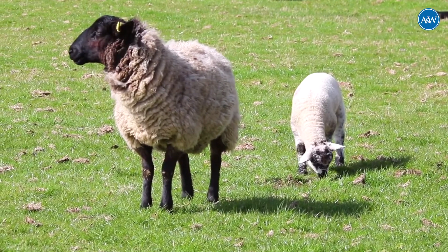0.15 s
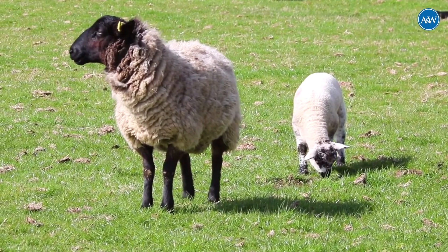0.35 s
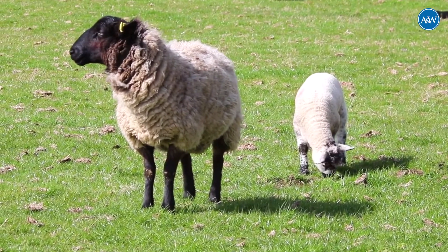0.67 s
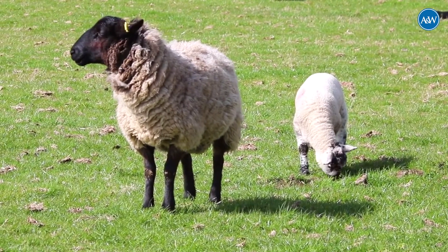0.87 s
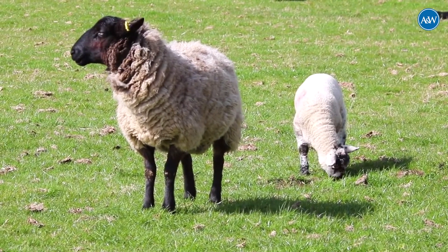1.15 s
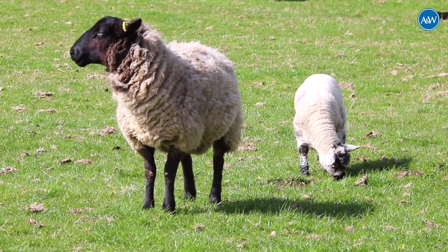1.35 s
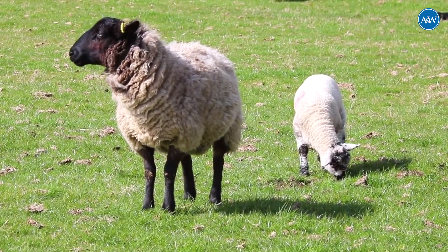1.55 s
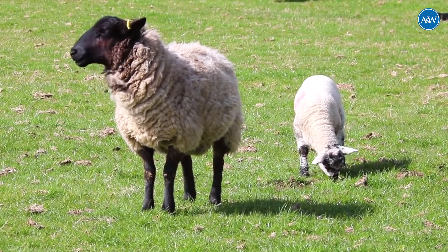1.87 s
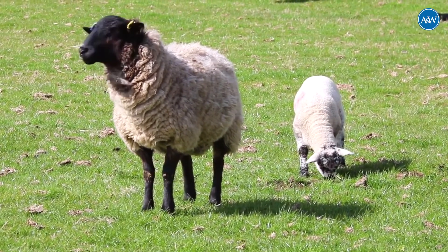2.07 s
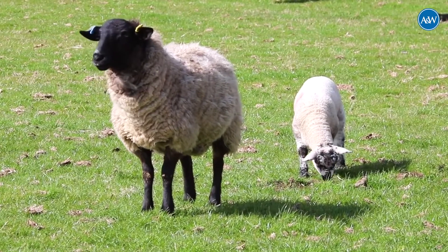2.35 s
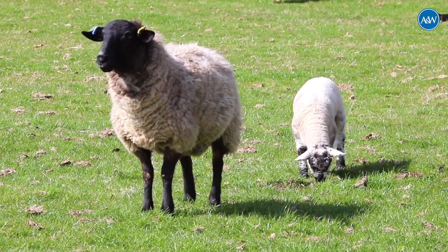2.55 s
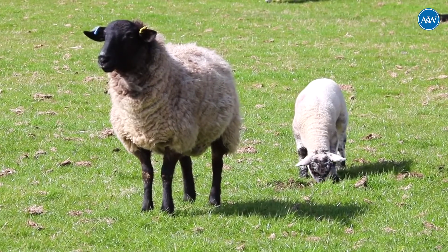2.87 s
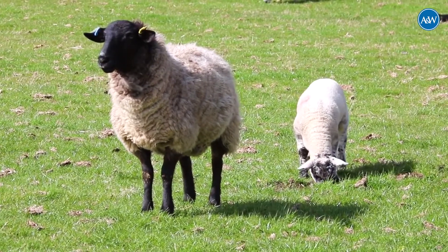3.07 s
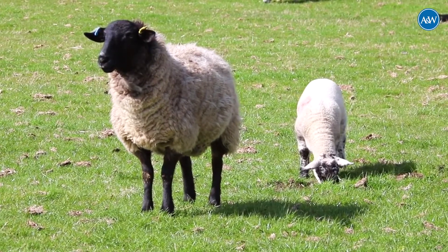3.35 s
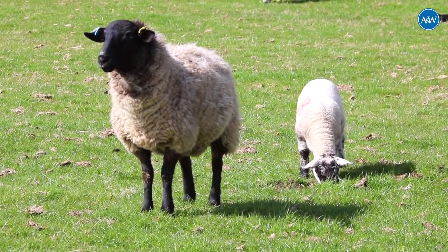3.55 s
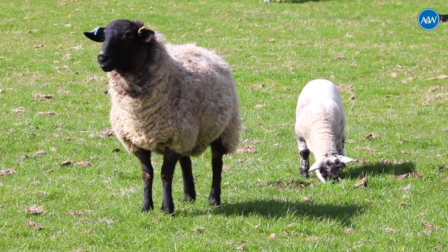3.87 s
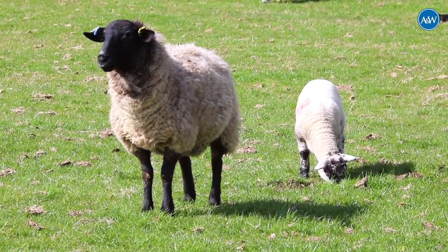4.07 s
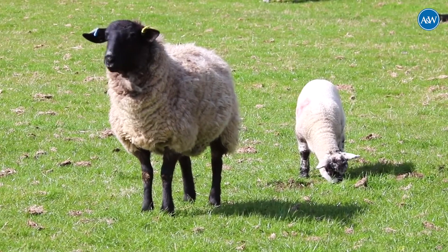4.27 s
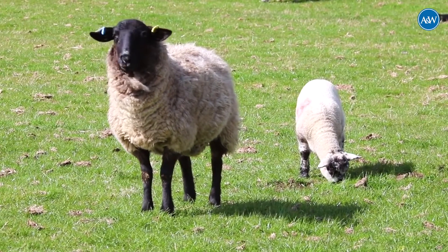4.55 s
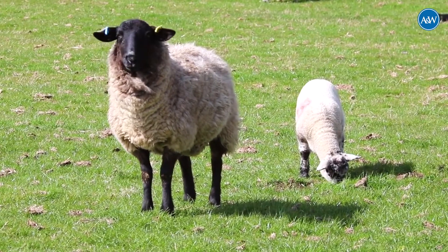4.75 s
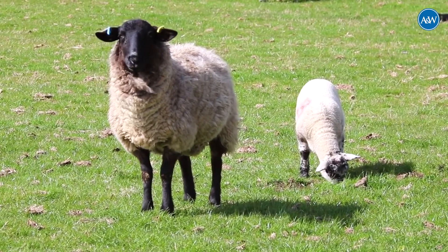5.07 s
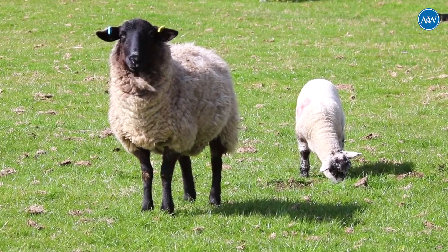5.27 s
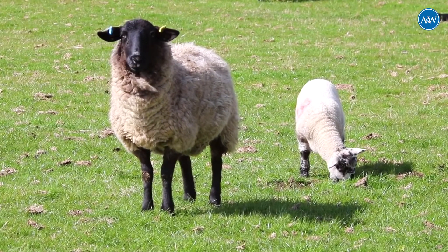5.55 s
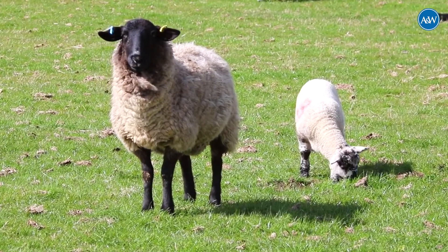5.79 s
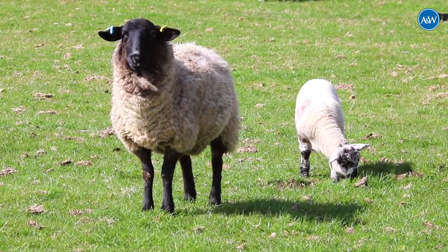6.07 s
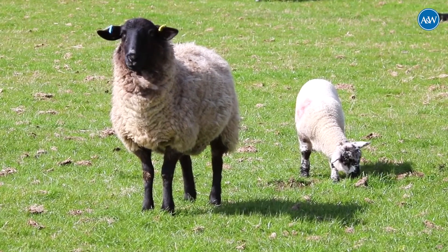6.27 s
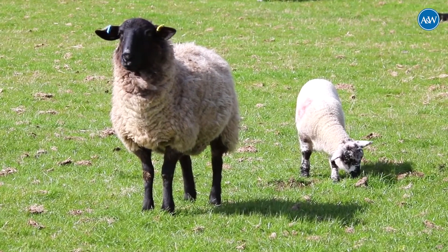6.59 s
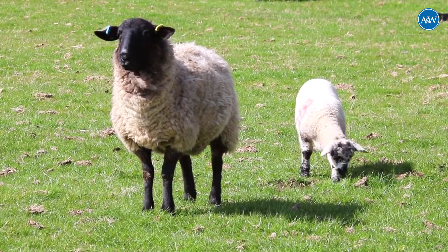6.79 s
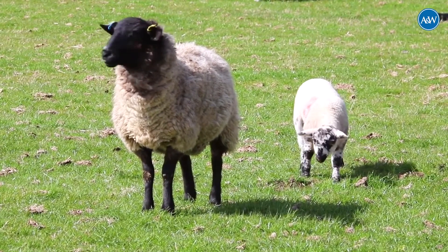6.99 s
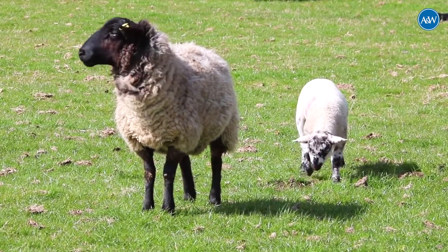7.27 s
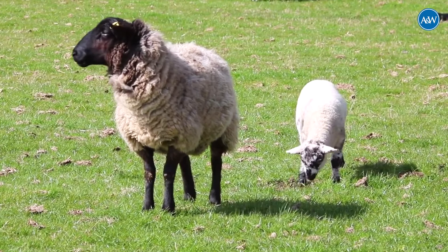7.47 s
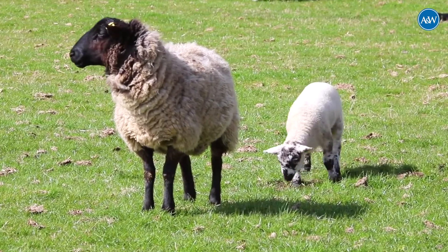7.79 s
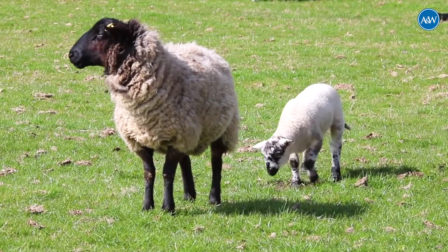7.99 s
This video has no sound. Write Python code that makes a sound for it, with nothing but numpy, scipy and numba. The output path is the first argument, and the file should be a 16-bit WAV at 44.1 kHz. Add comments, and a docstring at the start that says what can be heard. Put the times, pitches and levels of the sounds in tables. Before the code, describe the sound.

Gusty wind rumbles on the microphone and little birds twitter, with a single sheep bleat midway and faint hollow knocks later.

```python
"""Gusts buffet the microphone, each port on its own, and small birds whistle in trees to the right.
Midway a sheep gives one long bleat: pulses from its vocal folds excite the moving resonances of its
throat. A faint cooing and then dull, hollow knocks come from the left.
A far rumble and a faint hiss lie under it all."""
import sys
import numpy as np
from scipy import signal
from scipy.io import wavfile
from scipy.ndimage import uniform_filter1d
from numba import njit

SR = 44100
rng = np.random.default_rng(int(sys.argv[2]) if len(sys.argv) > 2 else 0)


def to_wav(s):
    """Save 16-bit WAV."""
    ch = np.atleast_2d(s).T  # columns
    pcm = np.round(np.clip(ch, -1, 1) * 32767)  # PCM
    wavfile.write(sys.argv[1], SR, pcm.astype(np.int16))


N = 358533

# the sheep's mouth: t/s, shape (0 outbreak, 0.5 half open, 1 held, 2 and above closing)
MOUTH = [(3.51, 0.02), (3.55, 0.54), (3.61, 0.79), (3.7, 0.91), (4.05, 1.18), (4.43, 1.56), (4.46, 1.32),
         (4.6, 1.92), (4.63, 3.9)]


def sheep(jitter=.0012, rasp_jitter=.002, shimmer_db=1.0, breath_db=-40):
    """Source-filter voice: one pulse per closure of the vocal folds, with breath, drives the throat."""
    # course of the bleat: t/s, f/Hz, level/dB
    bleat = [(3.516, 167.9, -41), (3.55, 173.6, -40.5), (3.585, 202.5, -44), (3.6, 213.4, -40),
             (3.641, 241.8, -43.5), (3.7, 248.2, -47), (3.901, 252.8, -50), (4.1, 252.2, -47),
             (4.301, 244.3, -50), (4.379, 244.6, -49), (4.43, 238.7, -50), (4.445, 233.4, -51.5),
             (4.499, 233, -51), (4.56, 228.6, -50), (4.611, 221.3, -49.5), (4.633, 208, -53)]
    # sharp high clicks on some pulses of the bleat: t/s, strength/dB
    clicks = [(3.5179, -17.5), (3.5244, -15), (3.5304, -22), (3.5364, -25), (3.5643, -30), (3.5997, -25),
              (3.6054, -28), (3.6177, -27), (3.6391, -33), (4.4069, -38), (4.6274, -43)]
    onset_s, release_s, edge_db = 0.0085, 0.014, -13
    quaver_hz, quaver_depth, quaver_from_s = 16, 0.0063, 4.44   # the voice trembles as it tires
    (first_s, first_hz, first_db), (last_s, last_hz, last_db) = bleat[0], bleat[-1]
    rows = [(first_s - onset_s, first_hz, first_db + edge_db), *bleat,
            (last_s + release_s, last_hz, last_db + edge_db)]
    pitch_hz, level_db = in_time(rows)
    start, end = round(rows[0][0] * SR), round(rows[-1][0] * SR)
    rasp = 1 - np.minimum(in_time(MOUTH)[0], 1)   # the outbreak is hoarser
    tired_s = np.maximum(np.arange(N) / SR - quaver_from_s, 0)
    quaver = -quaver_depth * np.sin(2 * np.pi * quaver_hz * tired_s)
    cycles = np.cumsum(pitch_hz * (1 + quaver + (jitter + rasp_jitter * rasp) * drift(46))) / SR
    cycles -= cycles[round((clicks[0][0] + .001) * SR)]   # a pulse falls on the first click
    pulse_at = np.flatnonzero(np.diff(np.floor(cycles)))
    late = (cycles[pulse_at + 1] % 1) * SR / pitch_hz[pulse_at]   # each falls between two samples
    strength = amp(shimmer_db * rng.standard_normal(N)[pulse_at])
    source = amp(breath_db + 6 * rasp * (1 - cycles % 1)) * rng.standard_normal(N)   # puffs of breath
    source[pulse_at] += strength * late
    source[pulse_at + 1] += strength * (1 - late)
    voice = amp(level_db) * throat(source)
    voice[:start], voice[end:] = 0, 0
    click_train = np.zeros(N)
    for s, db in clicks:
        nearest = np.argmin(abs(pulse_at - (s + .001) * SR))
        click_train[pulse_at[nearest]] = amp(db)
    return voice + band(click_train, 4000, 18000)


def throat(source, wander=.012, wander_db=1.8, wander_hz=5):
    """Parallel formants follow the mouth and wander a little; their sum is evened to a steady level."""
    # formants: f/Hz (outbreak, half open, held), width/Hz, gain/dB (outbreak, held, closing)
    formants = [(900, 930, 976, 90, -15, 5.5, -4), (2150, 1950, 1887, 170, -16, 2, -11),
                (2550, 2550, 2550, 270, -14, -1, -24), (2850, 3080, 3153, 324, 4, 7, -6),
                (3950, 3540, 3720, 200, 8, 7.5, 6), (4400, 4300, 4466, 200, -5, 1, -11),
                (5330, 5300, 5640, 350, 8, -2.5, -50)]
    shape, = in_time(MOUTH)
    out = np.zeros(N)
    for k, (outbreak_hz, half_hz, held_hz, width, *levels_db) in enumerate(formants):
        hz = np.interp(shape, [0, .5, 1], [outbreak_hz, half_hz, held_hz])
        turn = 2 * np.pi * hz * (1 + wander * drift(wander_hz)) / SR
        r = np.exp(-np.pi * width / SR)
        gain = amp(np.interp(shape, [0, 1, 2], levels_db) + wander_db * drift(wander_hz))
        out += (-1) ** k * gain * moving_resonance(moving_resonance(source, turn, r), turn, r * r)
    out -= resonance(out, hz=1330, width=400)   # antiresonance of the nasal cavity
    return out / np.sqrt(uniform_filter1d(out ** 2, 1500) + 1e-12)


def birds(burr_hz=250, octave_db=-18, trees_t60_s=0.42, trees_db=-1.5):
    """Fast random modulation broadens each whistle into a burr; the trees add reverberation."""
    # acoustic shadow: f/Hz, gain on the left/dB
    shadow = [(2000, 4), (3000, -1.5), (4200, -9.5), (6000, -18), (7500, -45), (11000, -32)]
    direct = np.zeros((2, N + SR))
    for s, hz, db, burr, rise in whistles():
        n, mid_hz = len(hz), hz.mean()
        u = np.arange(n) / n
        phase = 2 * np.pi * np.cumsum(hz) / SR
        tremble = drift(burr_hz, size=SR // 2)[:n] + 1j * drift(burr_hz, size=SR // 2)[:n]
        burr_share = np.clip(burr, 0, 1) ** 2
        modulation = np.sqrt(1 - burr_share) + np.sqrt(burr_share / 2) * tremble
        tone = np.real(modulation * np.exp(1j * phase))
        octave = amp(octave_db) * np.sin(2 * phase) * (mid_hz < 3800)   # low notes only
        swell = np.sin(np.pi / 2 * np.minimum(u / rise, (1 - u) / (1 - rise)))
        tone_left, octave_left = amp([at_hz(shadow, mid_hz), at_hz(shadow, 2 * mid_hz)])
        i = round(s * SR)
        direct[0, i:i + n] += amp(db + 3) * swell * (tone_left * tone + octave_left * octave)
        direct[1, i:i + n] += amp(db + 11) * swell * (tone + octave)
    direct = direct[:, :N]
    return direct + amp(trees_db) * np.array([scatter(side, trees_t60_s) for side in direct])


def whistles(glide_power=2.2, glide_rise=.36, arch_rise=.68):
    """Frequency sweeps: yields each note's start, pitch track, level, burr and share spent swelling."""
    # glides that settle on their end pitch: t/s, length/s, start f/Hz, end f/Hz, level/dB, burr (0-1)
    glides = [(0.601, 0.018, 3250, 5600, -66, 0.4), (0.604, 0.019, 3280, 4800, -59, 0),
              (0.607, 0.035, 5520, 5600, -52.5, 0.34), (0.8, 0.038, 3090, 3510, -64, 0.75),
              (0.893, .097, 6070, 7520, -61, 0.9), (0.898, 0.064, 7000, 9170, -64, 0.9),
              (0.891, 0.23, 4640, 6770, -67.5, 0.8), (0.902, 0.091, 3760, 4900, -74, 0),
              (.905, 0.22, 2493, 2638, -69.5, 0.5), (.907, 0.19, 7300, 11100, -77.5, 0),
              (0.945, 0.16, 2740, 3520, -69, 0.4), (0.983, 0.13, 5270, 5460, -67, 0.9),
              (1.034, 0.062, 6970, 7700, -55.5, .17), (1.075, 0.025, 6870, 7220, -57, 1),
              (1.096, 0.077, 4370, 4780, -59.5, 0.8), (1.334, 0.033, 2810, 2085, -69, 0.7),
              (1.347, 0.17, 3380, 4370, -71.5, 0.7), (1.433, 0.11, 3500, 3280, -71, 1),
              (1.526, 0.13, 3100, 4530, -67, 0.6), (1.624, 0.074, 3673, 3526, -61, 0.97),
              (1.727, 0.13, 3430, 3364, -66, 0.56), (1.842, 0.1, 6370, 5800, -57.5, 0.7),
              (1.995, 0.4, 2620, 2273, -79.5, 0.9), (2.252, 0.34, 7500, 7270, -86, 0.1),
              (2.561, 0.099, 2660, 3210, -64.5, 0.9), (2.583, 0.042, 5100, 5530, -65.5, 1),
              (2.59, 0.049, 6850, 7080, -62.5, 0.9), (2.594, 0.11, 4000, 4350, -71, 0.6),
              (2.599, 0.093, 1880, 2220, -75.5, 0.7), (2.626, 0.14, 6100, 6360, -66.5, 1),
              (2.724, 0.11, 6290, 6700, -64.5, 0.87), (2.63, 0.29, 4240, 3940, -70.5, 0.9),
              (2.671, 0.086, 2450, 2630, -69.5, 0.5), (2.727, 0.094, 2600, 3410, -68.5, 0.2),
              (2.813, 0.053, 4160, 4690, -58, 0.35), (3.067, 0.048, 3840, 3800, -69.5, 0.7),
              (3.102, 0.097, 3800, 4460, -62.5, 0.8), (3.163, 0.058, 4000, 5080, -64.5, 1),
              (3.171, 0.11, 3460, 3290, -66, 0.95), (3.12, .19, 6620, 7260, -70.5, 0.8),
              (3.266, 0.025, 2030, 3500, -62, 0.2), (3.273, 0.091, 3470, 4480, -62.5, 0.6),
              (3.27, 0.11, 5160, 5250, -72, 0.8), (3.48, 0.035, 3600, 4400, -68, .3),
              (3.367, 0.062, 3690, 3660, -57.5, 0.8), (3.318, 0.057, 6530, 7170, -69, .5),
              (3.697, 0.047, 7600, 6000, -64, 1), (3.704, 0.22, 7830, 7000, -61.5, 0.4),
              (3.84, 0.059, 6320, 6400, -54.5, 0.14), (3.888, 0.02, 6606, 6600, -50, 0.24),
              (3.9, 0.032, 6050, 5900, -66, .36), (3.904, 0.13, 7600, 7030, -63.5, 0),
              (4.021, 0.14, 7420, 6910, -62, 0.01), (4.17, 0.14, 7100, 6790, -71, 0.5),
              (4.377, 0.029, 7900, 7020, -66, 0.2), (4.385, 0.024, 6160, 5560, -68, 1),
              (4.608, 0.034, 5540, 5550, -63.5, 0.9), (4.609, 0.2, 8300, 7530, -62, 0.4),
              (4.631, 0.054, 7550, 7300, -59.5, 0.8), (4.733, 0.073, 8900, 8400, -72, 0.7),
              (4.75, .03, 7300, 7300, -70, 0.4), (4.795, 0.068, 8550, 8320, -62, 0.4),
              (4.818, 0.036, 8500, 7130, -58, 0.6), (4.819, 0.078, 7420, 7230, -60, 0.96),
              (4.835, 0.02, 3010, 3940, -67.5, 0.9), (4.9, 0.055, 2890, 4150, -69, 0.7),
              (4.901, 0.16, 6290, 6740, -59, 1), (4.924, 0.078, 8320, 8220, -51, 0.47),
              (4.982, 0.034, 5170, 5270, -63, 0.7), (4.983, 0.031, 3550, 2880, -68.5, .2),
              (5.037, 0.12, 2490, 2390, -68, 0.95), (5.011, 0.12, 5480, 4780, -57, 0.6),
              (5.019, 0.27, 7530, 7510, -63.5, 1), (5.121, 0.022, 3300, 3185, -61, 0.6),
              (5.183, 0.045, 4120, 4180, -60.5, 0.23), (5.228, 0.08, 5000, 5300, -65.5, 0.6),
              (5.252, 0.13, 4590, 4450, -64.5, 0.83), (5.314, 0.22, 8200, 7440, -64.5, 0.3),
              (5.331, .11, 5420, 5940, -49.5, 0.25), (5.332, 0.069, 6130, 6760, -51, 0.3),
              (5.335, 0.19, 4110, 4050, -68.5, 0.97), (5.467, 0.045, 5880, 6080, -50.5, 0.93),
              (5.524, 0.046, 6030, 5850, -62, 0.85), (5.619, 0.057, 5530, 6450, -54, 0.5),
              (5.652, 0.14, 5880, 5370, -67, 0.9), (5.704, 0.055, 7350, 7300, -55.5, 0.73),
              (5.709, 0.027, 7170, 6700, -50.5, 0.3), (5.742, 0.08, 4560, 4920, -65, 0.8),
              (5.783, 0.049, 5600, 5600, -58.5, 0.8), (5.794, 0.015, 6500, 6000, -58, .5),
              (5.828, 0.02, 2800, 4240, -62, 0.2), (5.864, 0.037, 6280, 6810, -54, 0.6),
              (5.969, 0.026, 6840, 6810, -53, 0.94), (5.97, 0.055, 5500, 5200, -69, 0.8),
              (6.046, 0.043, 7170, 7230, -50.5, 0.35), (6.063, 0.084, 7350, 7690, -45.5, 0),
              (6.131, 0.046, 2520, 4000, -73, 0.3), (6.134, 0.028, 8440, 8030, -58, 0.9),
              (6.178, 0.021, 7470, 7500, -60, 0.6), (6.204, 0.03, 5930, 5870, -53.5, 0.55),
              (6.226, 0.013, 6640, 4160, -60, 1), (6.227, 0.1, 3930, 4104, -60.5, 1),
              (6.363, 0.048, 3840, 3960, -64.5, 0.5), (6.377, 0.094, 4500, 4900, -62, .5),
              (6.438, 0.1, 4400, 4280, -63, 0.67), (6.554, 0.12, 3490, 2830, -66.5, 0.5),
              (6.64, 0.13, 7380, 7170, -60.5, 0.78), (6.728, 0.038, 3230, 2900, -72, 0.4),
              (7.192, 0.033, 2960, 3800, -65, 0), (7.513, 0.02, 3370, 2570, -73, 0),
              (7.666, 0.077, 3510, 2750, -69.5, 0.66), (7.708, 0.034, 4730, 5430, -61, 0.6),
              (7.748, 0.092, 5520, 5110, -61, 0.94), (7.752, 0.089, 4030, 3840, -74, 0.5),
              (7.755, 0.2, 7950, 6930, -69, 0.5), (7.791, 0.028, 5620, 6280, -58, 0.5),
              (7.818, .17, 3446, 2896, -66.5, 1), (7.944, 0.098, 3340, 3140, -68, 1),
              (8.026, 0.15, 3130, 2830, -65, 1), (8.016, 0.13, 5440, 6050, -60, 0.44)]
    # parabolic sweeps: t/s, length/s, f/Hz (start, middle, end), level/dB, burr (0-1)
    arches = [(1.04, .175, 3500, 4030, 4620, -58.5, .1), (1.385, .085, 2800, 3700, 2750, -63.5, .25),
              (1.585, .075, 2400, 3600, 3000, -61, .25), (1.812, .11, 5700, 6700, 6300, -53, .65),
              (3.112, .08, 2400, 3500, 2850, -60, .25), (3.308, .085, 2800, 3650, 2850, -60, .4)]
    for s, length, start_hz, end_hz, db, burr in glides:
        hz = end_hz + (start_hz - end_hz) * (1 - progress(length)) ** glide_power
        yield s, hz, db, burr, glide_rise
    for s, length, *pitches_hz, db, burr in arches:
        parabola = np.polyfit([0, .5, 1], pitches_hz, 2)
        yield s, np.polyval(parabola, progress(length)), db, burr, arch_rise


def wind(lumps_db=3.0, lumps_hz=14, brightening=0.58):
    """Turbulent pressure, uncorrelated between the ports; stronger gusts reach higher frequencies."""
    out = []
    for level_db in (gust_level(1), gust_level(-1)):
        deep = rms_one(band(band(rng.standard_normal(N), 27.0, 68.9, order=1), 10.3, 114.0, order=3))
        upper = rms_one(band(band(rng.standard_normal(N), 88, 155, order=1), 64, 193, order=3))
        gain = amp(level_db + lumps_db * drift(lumps_hz))
        out.append(gain * (deep + amp(8.5) * gain ** brightening * upper))
    return np.array(out)


def gust_level(side, calm_db=-52, fall_db=11.5):
    """Incoherent powers add: the level in dB at one port, from gusts over a calm breeze."""
    # gusts that rise and fall exponentially: peak t/s, half-length/s, level/dB, port (1 left, -1 right)
    gusts = [(0.01, 0.063, -27.5, 1), (.5, 0.32, -55, 1), (0.854, 0.29, -49, 1), (1.464, 0.071, -25.5, 1),
             (1.64, 0.058, -30.5, 1), (2.38, 0.18, -34, 1), (2.99, 0.24, -47, 1), (3.57, 0.32, -46.5, 1),
             (4.543, 0.18, -34.5, 1), (4.968, 0.18, -35.5, 1), (5.282, 0.11, -42, 1), (5.886, 0.2, -34, 1),
             (6.496, 0.13, -33.5, 1), (7.098, 0.21, -32, 1), (7.7, 0.44, -54, 1), (0.19, 0.28, -25.5, -1),
             (0.453, 0.22, -35.5, -1), (1.682, 0.092, -36.5, -1), (2.18, 0.29, -40.5, -1),
             (2.703, 0.36, -50, -1), (3.097, 0.048, -38.5, -1), (4.004, 0.059, -35, -1),
             (4.226, 0.13, -33, -1), (4.548, 0.25, -35, -1), (4.843, 0.18, -31.5, -1),
             (5.198, 0.051, -35, -1), (5.394, 0.047, -31, -1), (5.75, 0.12, -29, -1), (6.08, 0.3, -39, -1),
             (6.494, 0.16, -33.5, -1), (6.797, 0.15, -23.5, -1), (6.998, 0.089, -26, -1),
             (7.397, 0.32, -27.5, -1), (7.946, 0.15, -30.5, -1)]
    t = np.arange(0, N, 200) / SR
    power = amp(2 * calm_db) + sum(amp(2 * (db - fall_db * abs(t - s) / half_s))
                                   for s, half_s, db, port in gusts if port * side > 0)
    return np.interp(np.arange(N) / SR, t, 10 * np.log10(power))


def buffets(peak_cycles=0.85, sag=0.24):
    """An eddy hits one port: a pressure transient of a few uneven swings that sag in pitch and decay."""
    # eddies: t/s, level/dB, nominal f/Hz, left over right/dB
    eddies = [(0.427, -20.5, 111, -33), (1.442, -5, 103, 50), (1.526, -10, 92.6, 41),
              (3.95, -22.5, 80.6, -41), (5.589, -14.5, 57, -35), (6.681, -23, 80, -25),
              (6.773, -7, 64, -41), (7.151, -11.5, 59.6, 29), (7.886, -23, 90.8, -30),
              (7.925, -20.5, 83, -32)]
    out, t = np.zeros((2, N + 8000)), np.arange(8000) / SR
    for (s, db, hz, pan_db), offset in zip(eddies, rng.uniform(0, 2 * np.pi, (len(eddies), 2))):
        age = t * hz / peak_cycles
        swell = (age * np.exp(1 - age)) ** 2
        phase = 2 * np.pi * 1.325 * np.log(1 + sag * t * hz) / sag
        swing = np.sin(phase + offset[0]) + 0.38 * swell * np.sin(2.15 * phase + offset[1])
        loss_db = 10 * np.log10(6 + 10 ** (np.array([[-pan_db], [pan_db]]) / 10))   # left, right
        i = round(s * SR)
        out[:, i:i + len(t)] += amp(db + 1.5 - loss_db) * swell * swing
    return out[:, :N]


def knocks(spread_db=1.3):
    """Soft blows excite two damped modes of a hollow body, in a slightly different balance each time."""
    # blows: t/s, strength/dB
    blows = [(5.725, -47), (5.975, -44.5), (6.239, -41), (6.524, -38), (7.274, -37.5), (7.579, -36.5),
             (7.853, -35)]
    # modes of the body: f/Hz, width/Hz, gain/dB
    modes = [(455, 95, 30.5), (570, 77, 27)]
    out = np.zeros(N)
    for (s, db), balance_db in zip(blows, rng.normal(0, spread_db, (len(blows), 2))):
        force, i = np.full(8000, 1e-18), round((s - .008) * SR)
        for lag_s, lag_db in [(0, -11), (.008, 11.5), (.03, -28)]:   # lead-in, blow, late echo
            force[round(lag_s * SR)] = amp(db + lag_db)
        for (hz, width, gain_db), own_db in zip(modes, balance_db):
            ring = resonance(resonance(force, hz, width), hz, 2 * width)
            out[i:i + 8000] += amp(gain_db + own_db) * ring[:N - i]
    out += amp(-1) * scatter(out, t60=0.056)
    return out * amp([[4], [-7]])


def coos(flutter_db=4.0, flutter_hz=18):
    """Far pigeon-like hoots: gliding tones, breathy with random modulation and blurred by echoes."""
    # hoots: t/s, length/s, start f/Hz, end f/Hz, level/dB
    hoots = [(4.4, 0.14, 512.4, 520, -62), (4.65, 0.13, 501, 502, -57), (4.85, 0.15, 485, 456, -54.5),
             (5.08, 0.12, 470, 530, -54), (5.18, 0.18, 523, 494, -61), (5.65, 0.17, 499, 519, -55),
             (6.27, 0.097, 535, 513, -56.5)]
    out = np.zeros(N)
    for s, length, start_hz, end_hz, db in hoots:
        u, i = progress(length), round(s * SR)
        phase = 2 * np.pi * np.cumsum(start_hz + (end_hz - start_hz) * u) / SR
        out[i:i + len(u)] += amp(db) * np.sin(np.pi * u) * np.sin(phase)
    out *= amp(flutter_db * drift(flutter_hz))
    return (out + amp(-8) * scatter(out, t60=.3)) * amp([[0], [-8]])


def rumble_and_hiss(level_db=-52, flicker_db=1.76, lead_samples=15):
    """A far noise field, partly coherent between the ports, in flickering third-octave bands."""
    # spectral density: f/Hz, relative level/dB
    spectrum = [(88, -37), (150, -11.5), (213, 3), (348, -11), (457, -5.5), (555, -12.5), (649, -7.5),
                (960, -10), (1530, -24), (3040, -29.5), (3840, -37), (7040, -32.5), (9080, -44.5),
                (14500, -31.5), (16000, -38)]
    # likeness of the two ports: f/Hz, coherence (0-1)
    coherence = [(130, .3), (290, .8), (640, .5), (1000, .15), (2000, .1), (15000, .2)]
    # level difference between the ports: f/Hz, left over right/dB
    leaning = [(60, 0.5), (110, -40), (200, 3.5), (380, 3.5), (700, 7.5), (1290, -3), (2380, -0.5),
               (4400, -6), (8120, -2.5), (15000, 2.5)]
    out, edges = 0, 110 * 2 ** (np.arange(23) / 3)
    white, flicker = rng.standard_normal((2, 2, N)), drift(7.9)
    for k, (low, high) in enumerate(zip(edges, edges[1:])):
        mid, side = band(white[k % 2], low, high)
        hz = np.sqrt(low * high)
        alike, lean_db = np.clip(at_hz(coherence, hz), 0, 1), at_hz(leaning, hz) / 2
        gain = amp(at_hz(spectrum, hz) + flicker_db * np.roll(flicker, 15013 * k))
        lag = lead_samples if hz < 900 else 0   # the rumble reaches the left port first
        common = np.sqrt(1 + alike) * np.array([mid, np.roll(mid, lag)])
        opposed = np.sqrt(1 - alike) * side * [[1], [-1]]
        out = out + gain * amp([[lean_db], [-lean_db]]) * (common + opposed)
    return amp(level_db) * rms_one(out)


def scatter(x, t60, first_echo_s=.012):
    """Scattering off trunks and ground: convolution with a decaying noise tail of unit energy."""
    t = np.arange(int(t60 * SR)) / SR
    tail = rng.standard_normal(SR)[:len(t)] * amp(-60 * t / t60) * (t > first_echo_s)
    return signal.fftconvolve(x, tail / np.sqrt(np.sum(tail ** 2)))[:N]


def resonance(x, hz, width):
    """Damped resonator: a two-pole band-pass with unit peak gain."""
    r = np.exp(-np.pi * width / SR)
    poles = [1, -2 * r * np.cos(2 * np.pi * hz / SR), r * r]
    return signal.lfilter([(1 - r * r) / 2, 0, (r * r - 1) / 2], poles, x)


@njit
def moving_resonance(x, turn, r):
    """Time-varying resonator with pole radius r and centre `turn` in radians per sample."""
    y = np.zeros(len(x))
    for i in range(2, len(x)):
        drive = (1 - r * r) / 2 * (x[i] - x[i - 2])
        y[i] = drive + 2 * r * np.cos(turn[i]) * y[i - 1] - r * r * y[i - 2]
    return y


def band(x, low_hz, high_hz, order=2):
    """Butterworth band-pass."""
    return signal.sosfilt(signal.butter(order, [low_hz, high_hz], "band", fs=SR, output="sos"), x)


def drift(hz, size=N):
    """Random fluctuation of unit power: noise twice through a one-pole low-pass."""
    r = np.exp(-2 * np.pi * hz / SR)
    return rms_one(signal.lfilter([1], [1, -2 * r, r * r], rng.standard_normal(size + 4000))[4000:])


def amp(db):
    """Decibels to amplitude ratio."""
    return 10 ** (np.asarray(db) / 20)


def rms_one(x):
    """Normalisation to unit power."""
    return x / np.sqrt(np.mean(x ** 2) + 1e-20)


def in_time(rows):
    """Columns of a time table, interpolated at every sample."""
    s, *columns = np.transpose(rows)
    return [np.interp(np.arange(N) / SR, s, c) for c in columns]


def at_hz(points, hz):
    """A spectrum table, interpolated on a logarithmic frequency axis."""
    frequencies, values = np.transpose(points)
    return np.interp(np.log(hz), np.log(frequencies), values)


def progress(length):
    """Normalised time, from 0 to 1 over a note."""
    return np.arange(int(length * SR)) / (length * SR)


def scene():
    """Superposition of all sources, left and right; the sheep is in the middle."""
    return sheep() + birds() + knocks() + coos() + wind() + buffets() + rumble_and_hiss()


def record(dry, stopband_hz=16300):
    """Band limiting: a steep low-pass removes the highest treble."""
    return signal.sosfilt(signal.cheby2(12, 70, stopband_hz, fs=SR, output="sos"), dry)


dry = scene()
out = record(dry)
to_wav(out)
```